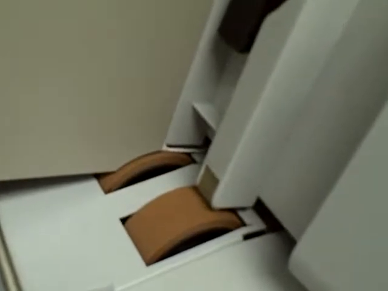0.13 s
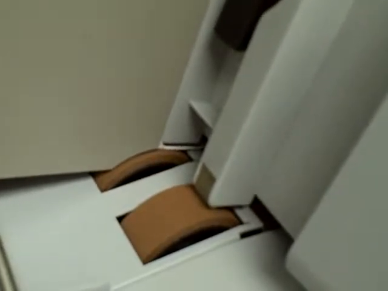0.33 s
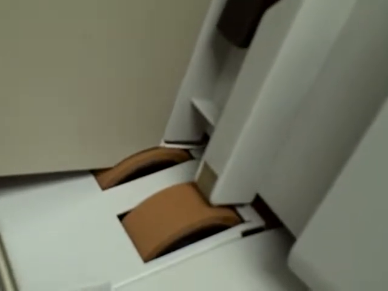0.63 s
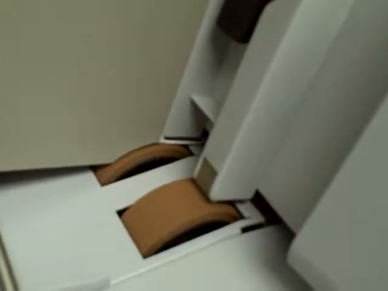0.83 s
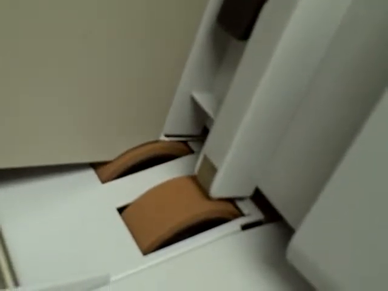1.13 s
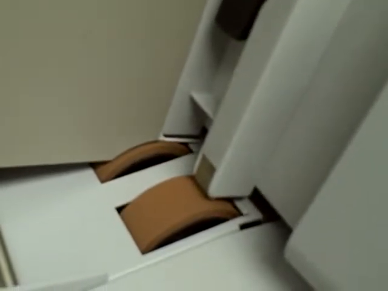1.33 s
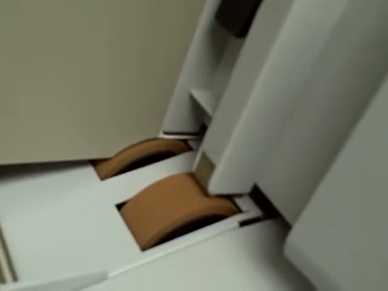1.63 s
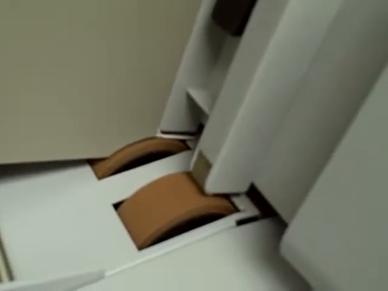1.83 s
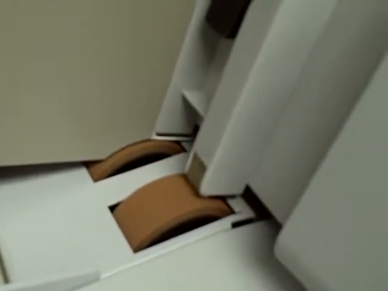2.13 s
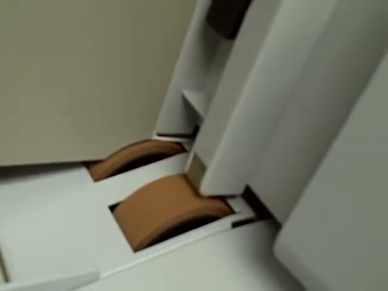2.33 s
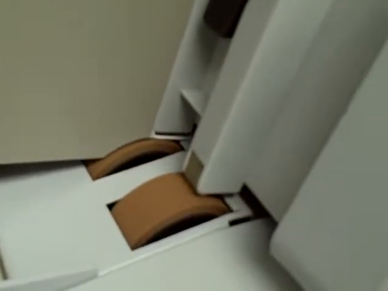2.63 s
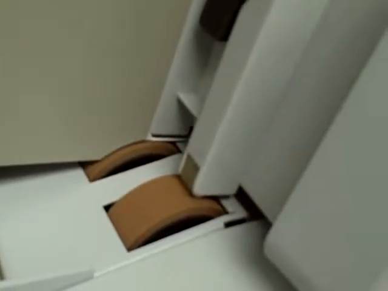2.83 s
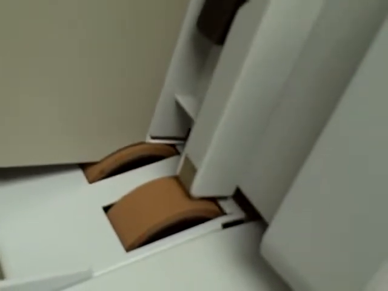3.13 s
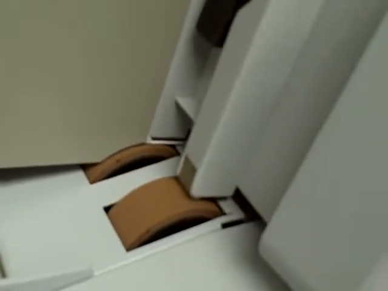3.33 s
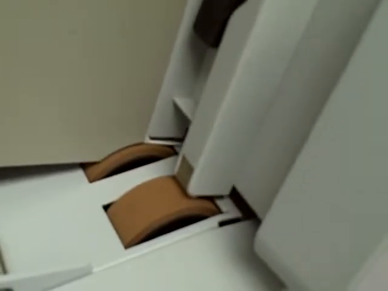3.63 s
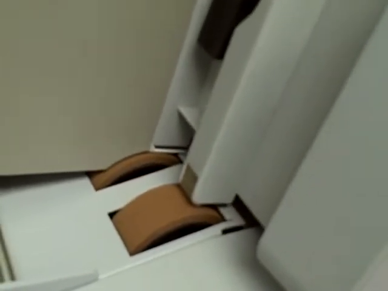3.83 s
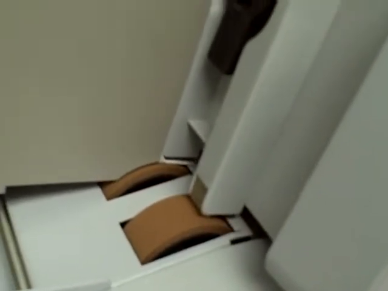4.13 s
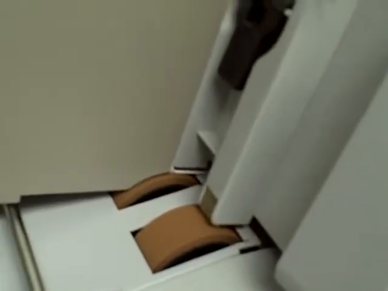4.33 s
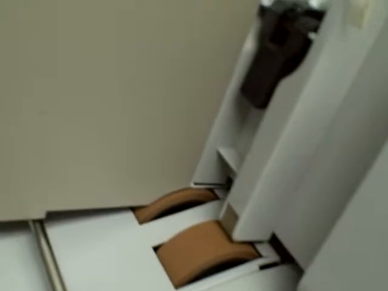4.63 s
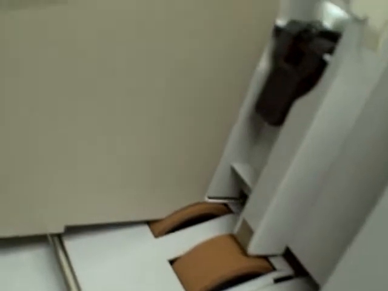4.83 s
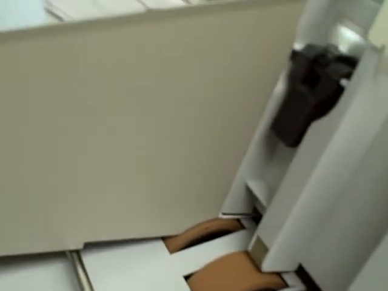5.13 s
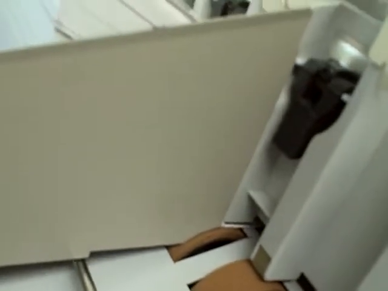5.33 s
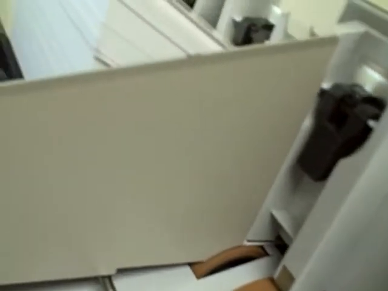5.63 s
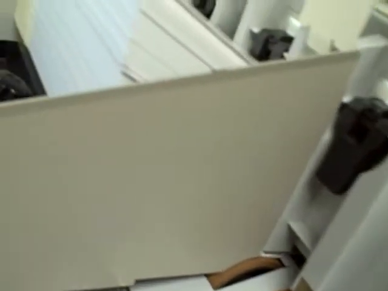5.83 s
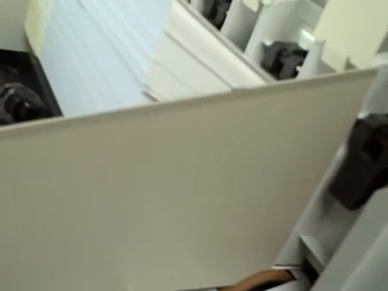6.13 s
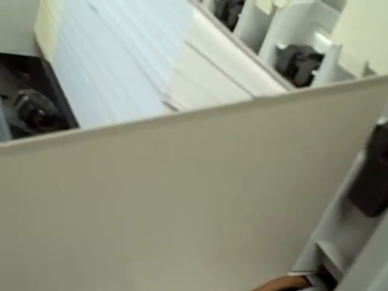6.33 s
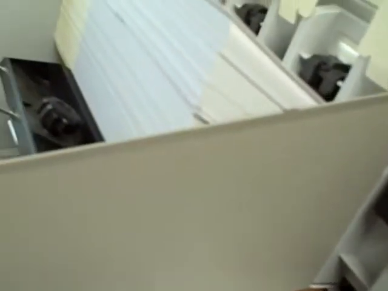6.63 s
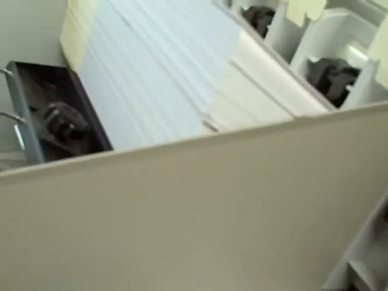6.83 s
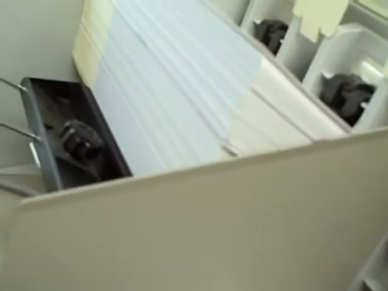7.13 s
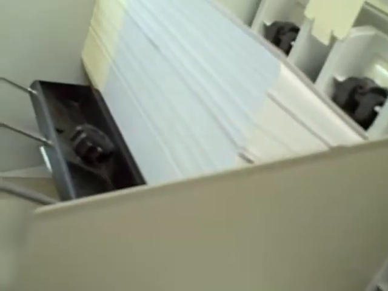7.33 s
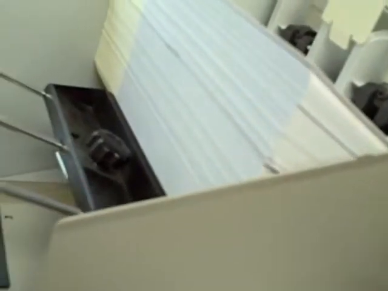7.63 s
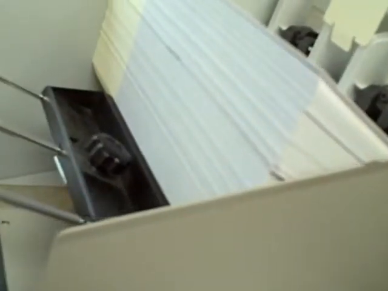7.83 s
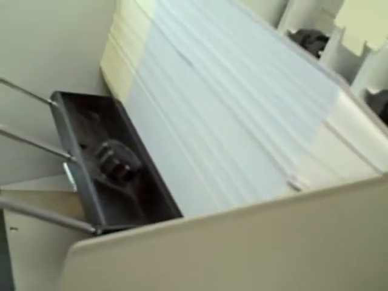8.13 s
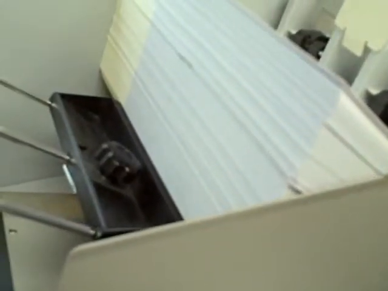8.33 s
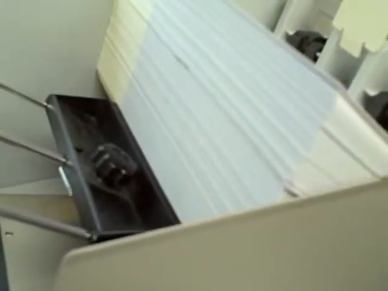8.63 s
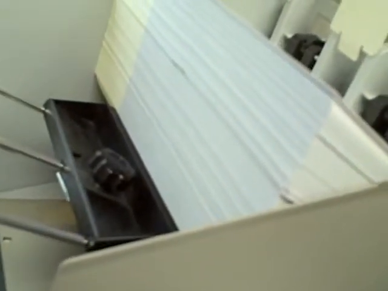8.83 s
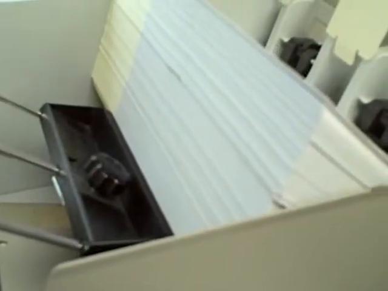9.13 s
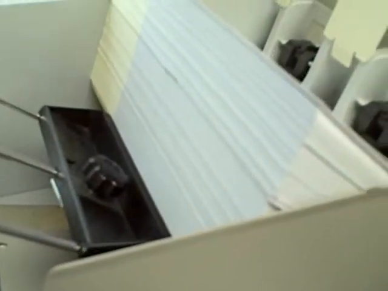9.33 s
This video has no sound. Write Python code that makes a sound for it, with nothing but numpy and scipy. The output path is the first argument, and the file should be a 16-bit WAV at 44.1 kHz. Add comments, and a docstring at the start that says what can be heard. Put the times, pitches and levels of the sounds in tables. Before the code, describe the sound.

From 0 s a card slaps hard against a stop, and the cycle repeats evenly about every 0.58 s until the end near 9.4 s, some seventeen slaps in all. Between slaps the rollers jerk twice, roughly 0.15 s apart, each a short dry rasp with a tiny squeak and a flick as the card comes free. A rattling run of about an eighth of a second then drives the card to the stop: a bright crack with a woody knock and quick rebound. The plastic housing booms and shudders below; loose levers click irregularly, one sharp, high clack standing out near 6.9 s. Faint motor hum and whir continue underneath. From about 4.5 to 7 s the close microphone rises from the rollers towards the stack: runs soften slightly, plate ring and a faint gear whine grow. Small room, short echo, crisp but treble-limited, peaks slightly saturated.

```python
"""A card slaps against a stop, then the next ones follow at about 1.7 a second, close to a small microphone.
This is an addressing printer: for each card the rollers jerk twice, then the card rattles to the stop.
Rollers, runs and clicks are shaped noise; the stop, levers and card edges are decaying sines.
The plastic housing booms as noise and pushes through resonances; rocking, brushes and echoes are noise too.
A motor hums underneath as unsteady sines and whirring noise, in a small room."""
import sys
import numpy as np
from scipy import signal
from scipy.fft import rfft, irfft, next_fast_len
from scipy.io import wavfile
from scipy.ndimage import uniform_filter1d, map_coordinates

SR = 44100
rng = np.random.default_rng(int(sys.argv[2]) if len(sys.argv) > 2 else 0)


def store_pcm(level_fs):
    """Save levels as 16-bit WAV."""
    pcm = np.round(np.clip(level_fs, -1, 1) * 32767).astype(np.int16)
    wavfile.write(sys.argv[1], SR, np.atleast_2d(pcm).T)


N = 418509

# All levels are relative.
# feed roller jerks, two per card: t/s, grab level/dB, drag level/dB
JERKS = [(.179, -14, -18), (.332, -15.5, -25), (.763, -13.5, -30), (.904, -14, -27), (1.334, -12, -18.5),
         (1.477, -13, -36), (1.901, -15, -37), (2.022, -12, -17), (2.483, -14, -17), (2.657, -15.5, -30),
         (3.084, -15, -25.5), (3.222, -13, -31.5), (3.664, -13, -16.5), (3.824, -16, -33),
         (4.25, -14.5, -26.5), (4.389, -15, -29.5), (4.824, -14, -18), (4.989, -17, -29.5),
         (5.412, -15.5, -26.5), (5.549, -16.5, -31.5), (5.989, -15.5, -18), (6.152, -18, -37.5),
         (6.571, -18.5, -35), (6.698, -15, -19.5), (7.159, -15, -22.5), (7.287, -15, -29),
         (7.747, -15, -43), (7.882, -17, -29.5), (8.318, -15, -18.5), (8.487, -18.5, -33.5),
         (8.931, -18, -33), (9.051, -16, -20.5)]
# cards reaching the stop: t/s, slap level/dB
STOP_HITS = [(.009, -8.5), (.608, -8), (1.176, -10), (1.755, -7.5), (2.330, -8), (2.932, -9), (3.499, -9.5),
             (4.100, -7.5), (4.66, -9.5), (5.263, -9.5), (5.824, -9.5), (6.429, -8), (7.003, -10.5),
             (7.565, -9), (8.160, -8), (8.762, -8.5), (9.368, -9.5)]
# loudest clacks of loose levers and card edges: t/s, level/dB, ring f/Hz
CLACKS = [(.826, -24.5, 2390), (1.555, -25, 6460), (1.979, -22.5, 2580), (3.170, -23, 6840),
          (4.303, -27, 5460), (6.660, -25.5, 2510), (6.878, -16, 6220), (7.812, -27, 5040)]
# housing resonances: f/Hz, width/Hz, level/dB
HOUSING_MODES = [(105.6, 5.8, -5), (135, 27, -4), (174, 8.6, 4.5), (195.3, 32.6, 3.5), (254.5, 20, -1.5),
                 (326.6, 23, 0.5), (376, 32, 0), (421.4, 34, -0.5), (480, 16, -3), (570.5, 14.7, 1),
                 (621, 17, -5.5), (691, 18, -7.5), (798, 20, -4.5)]
# thin guide plate resonances: f/Hz, width/Hz, level/dB
PLATE_MODES = [(1286, 69, -3), (1708, 47, 0), (1680, 46, 1), (1964, 60, -11.5)]
# machine rocking on its feet: f/Hz, width/Hz, level/dB
FRAME_MODES = [(19, 11, -0.5), (50, 11, 0.5), (92, 51, -8)]
# card stop modes: f/Hz, level/dB, t60/s
STOP_MODES = [(594, -12.5, 0.11), (637, -11.5, 0.081), (687, 1, 0.047), (784, -1.5, 0.026),
              (844, -7.5, 0.049), (1310, -10.5, 0.0059), (2220, -10, 0.0082)]
# spectrum of rasping and clicking: f/Hz, level per Hz/dB
RASP_SPECTRUM = [(250, -18), (600, -7.5), (950, -14.5), (1500, -11), (2200, -11), (3000, -11.5), (3800, -9),
                 (4900, -8.5), (5700, -3), (6500, -1.5), (7300, -4), (8200, -17.5), (9200, -34),
                 (10500, -70)]
# spectrum of the idle rollers: f/Hz, level per Hz/dB
WHIR_SPECTRUM = [(10, -21), (20, 8), (55, -1.5), (105, 2), (180, 1.5), (290, -2.5), (400, -1), (700, -7),
                 (1100, -20.5), (3000, -23), (5000, -18.5), (6600, -16), (8000, -19), (9500, -66.5)]
# motor lines: f/Hz, level/dB
HUM_LINES = [(108, -44), (335, -54.5)]
# room decay: f/Hz, t60/s
ROOM_DECAY = [(100, 0.58), (600, 0.36), (2000, 0.28), (8000, 0.099)]
# microphone moving from the housing up over the plates: t/s, housing level/dB, plates level/dB
NEARNESS_LEVELS = [(0, 0.5, -15), (2.8, -2, -17.5), (4.6, -2, -16.5), (6.2, -1.5, -12.5),
                   (7.5, -1.5, -13.5), (9.4, -1, -14)]
# transport fading as the microphone leaves the rollers: t/s, run level/dB
RUN_LEVELS = [(0, -16.5), (4.5, -17), (6.5, -19.5), (9.4, -19.5)]
# gear whine, following the microphone's distance to the upper works: t/s, level/dB
WHINE_LEVELS = [(0, -55), (4.6, -56.5), (6.5, -52), (8.2, -51), (9.4, -55)]

GRAB_S, DRAG_S = .013, .06  # roller bite; card comes free
GRAB_RISE_S, GRAB_FIRST_SHARE = .0083, .88  # grip tightens from this share
RUN_S = .128  # drive before the stop
GATE_LEAD_S, REBOUND_S = .04, .0033  # before and after the stop hit
# tick as the drive takes up slack
SLACK_CHANCE, SLACK_LEAD_S, SLACK_SCATTER_S = .55, .028, .007
SLACK_MEAN_DB, SLACK_MEAN_HZ = -29.5, 5800
FLICK_RE_DRAG_DB, FLICK_MEAN_HZ = -4, 4660  # card edge coming free
SQUEAK_LAG_S, SQUEAK_RE_GRAB_DB, SQUEAK_MEAN_HZ = .007, -2.5, 6450  # rubber biting
TICK_SCATTER_DB, TICK_SCATTER_OCT = 3, .13
MIC_CORNER_HZ, TOP_HZ, CLIP_LEVEL = 8600, 15900, .78


def amp(db):
    """Decibels to gain."""
    return 10 ** (np.asarray(db) / 20)


def unit(x):
    """Scaled to rms 1."""
    return x / np.sqrt(np.mean(np.abs(x) ** 2) + 1e-20)


def along(points, hz):
    """(Hz, value) points interpolated on a log axis."""
    f, v = np.transpose(points)
    return np.interp(np.log(hz + 1), np.log(f + 1), v)


def at_each_sample(t_s, values):
    """A timed curve read at every sample."""
    return np.interp(np.arange(N) / SR, t_s, values)


def wobble(rate_hz):
    """Smooth random curve, rate_hz knots a second."""
    knots = rng.standard_normal(int(N * rate_hz / SR) + 4)
    return map_coordinates(knots, [np.arange(N) * rate_hz / SR])


def filtered(x, response):
    """x times a response of frequency."""
    m = next_fast_len(N + SR // 2)
    return irfft(rfft(x, m) * response(np.fft.rfftfreq(m, 1 / SR)), m)[:N]


def coloured(x, spectrum):
    """x through a broad spectrum of rms gain 1."""
    return filtered(x, lambda f: unit(amp(along(spectrum, f))))


def rung(x, modes):
    """x through parallel resonances, rms gain 1 together."""
    def response(f):
        return unit(sum(amp(db) * 1j * f * w / (c * c - f * f + 1j * f * w) for c, w, db in modes))
    return filtered(x, response)


def chatter(rate_hz, depth_db):
    """Noise bunched into tiny irregular contacts."""
    level_db = depth_db * np.clip(wobble(rate_hz), -2, 2)
    return unit(rng.standard_normal(N) * amp(level_db))


def fade(t, hold_s, t60_s):
    """Zero before t = 0, one while held, then exponential decay."""
    return (t >= 0) * amp(-60 * np.maximum(t - hold_s, 0) / t60_s)


def add(track, t_s, piece):
    """Adds a piece to the track at time t_s."""
    at = round(t_s * SR) + np.arange(len(piece))
    inside = (at >= 0) & (at < N)
    track[at[inside]] += piece[inside]


def knocks(rows, hold_s, t60_s):
    """Envelope of short blows from (s, dB) rows, summed as power."""
    power, t = np.zeros(N), np.arange(SR // 4) / SR
    for t_s, db in rows:
        add(power, t_s, (amp(db) * fade(t, hold_s, t60_s)) ** 2)
    return np.sqrt(power)


def transport():
    """Feeding and running rasp on the card, ring the plates, boom in the housing and rock the frame."""
    housing_db, plates_db = nearness()
    grab, drag = feed_force(grab_t60_s=.12, drag_t60_s=.17, touch_db=-5, touch_t60_s=.018)
    feed = np.hypot(grab, drag)
    run = run_force(start_share=.27, swell_s=.024, coast_s=.062, coast_t60_s=.66, brake_t60_s=.13)

    # card kicks the gate
    gate_rows = [(stop_s - GATE_LEAD_S, run_db + 3) for stop_s, run_db in runs()]
    gate = knocks(gate_rows, hold_s=.0047, t60_s=.14)
    # card catches and slips on the rollers
    slip = amp(.92 * wobble(130))
    feed_rasp = amp(-.9) * feed * chatter(600, depth_db=1.5)
    run_rasp = run * chatter(450, depth_db=1)
    contact = slip * (feed_rasp + run_rasp) + gate * chatter(700, depth_db=.5)
    rasp = coloured(flexing(contact, depth_db=3), RASP_SPECTRUM)

    plates = amp(plates_db) * rung(np.hypot(feed, run) * chatter(50, depth_db=4), PLATE_MODES)

    # heavy housing lags the rollers and builds up slowly in a run
    heave = np.pad(feed, (round(.012 * SR), 0))[:N]
    boom = run_force(start_share=.3, swell_s=.12, coast_s=.075, coast_t60_s=.39, brake_t60_s=.15)
    rattle = (amp(-7.5) * heave + amp(-2.5) * boom) * chatter(200, depth_db=1.5)
    pushes = amp(-3) * shoves(clutch_lag_s=.02, release_lag_s=.071, width_s=.0013)
    housing = amp(housing_db) * rung(rattle + pushes, HOUSING_MODES)

    rocking = amp(-8.5) * drag + amp(-19.5) * grab + amp(-28) * run
    frame = rung(rocking * rng.standard_normal(N), FRAME_MODES)
    return rasp + plates + housing + frame


def feed_force(grab_t60_s, drag_t60_s, touch_db, touch_t60_s):
    """A roller touches the card and tightens its grip; its drag grows until the card comes free."""
    grab, drag, t = np.zeros(N), np.zeros(N), np.arange(SR // 3) / SR
    touch = amp(touch_db) * fade(t, 0, touch_t60_s)[::-1]  # swells up to the grab
    grip = np.interp(t, [0, GRAB_RISE_S], [GRAB_FIRST_SHARE, 1]) * fade(t, GRAB_S, grab_t60_s)
    grab_shape = np.concatenate([touch, grip])
    growth = np.minimum(t / DRAG_S, 1)
    release = fade(t, DRAG_S, drag_t60_s)
    for t_s, grab_db, drag_db in JERKS:
        add(grab, t_s - len(t) / SR, (amp(grab_db) * grab_shape) ** 2)
        add(drag, t_s, growth * (amp(drag_db) * release) ** 2)
    return np.sqrt(grab), np.sqrt(drag)


def run_force(start_share, swell_s, coast_s, coast_t60_s, brake_t60_s):
    """The transport gathers speed, drives the card up to the stop, coasts and brakes."""
    power, t = np.zeros(N), np.arange(SR // 2) / SR
    coasting = fade(t, RUN_S, coast_t60_s)
    braking = fade(t, RUN_S + coast_s, brake_t60_s)
    drive = np.minimum(start_share + t / swell_s, 1) * coasting * braking
    for stop_s, run_db in runs():
        add(power, stop_s - RUN_S, (amp(run_db) * drive) ** 2)
    return np.sqrt(power)


def runs():
    """One transport run per card: (stop s, run dB)."""
    return [(stop_s, np.interp(stop_s, *np.transpose(RUN_LEVELS))) for stop_s, _ in STOP_HITS]


def shoves(clutch_lag_s, release_lag_s, width_s):
    """Soft pushes on the housing: the clutch engages, the gate swings, the clutch lets go."""
    track, t = np.zeros(N), np.arange(SR // 40) / SR
    push = (1 - t / width_s) * np.exp(-t / width_s)
    moves = [(clutch_lag_s - RUN_S, 0), (-GATE_LEAD_S, -1), (release_lag_s, -5)]  # lag/s, level/dB
    for stop_s, run_db in runs():
        for lag_s, db in moves:
            t_s = stop_s + lag_s + rng.normal(0, .00203)
            add(track, t_s, amp(run_db + db + rng.normal(0, .91)) * push)
    return track


def flexing(x, depth_db):
    """The card bends as it moves, so its colour shifts in short time-frequency patches."""
    z = signal.stft(x, nperseg=256)[2]
    patches = uniform_filter1d(rng.standard_normal(z.shape), size=3, axis=0)
    patches = uniform_filter1d(patches, size=6, axis=1)
    return signal.istft(z * unit(amp(depth_db * unit(patches))), nperseg=256)[1][:N]


def nearness():
    """Housing and plate levels at the microphone, in dB at each sample."""
    t_s, *columns = np.transpose(NEARNESS_LEVELS)
    return [at_each_sample(t_s, level_db) for level_db in columns]


def slaps():
    """The card hits the stop, which knocks as damped sines, and rebounds once as a second noise burst."""
    knock, t = np.zeros(N), np.arange(SR // 8) / SR
    for t_s, db in STOP_HITS:
        ring = np.zeros(len(t))
        for hz, mode_db, t60_s in STOP_MODES:
            gain = amp(mode_db + rng.normal(0, 2.3))
            mode_hz = hz * (1 + rng.normal(0, .019))
            ring += gain * fade(t, 0, t60_s) * np.sin(2 * np.pi * mode_hz * t)
        add(knock, t_s + .00149, amp(db) * ring)
    first = knocks(STOP_HITS, hold_s=.0019, t60_s=.01)
    second = knocks([(t_s + REBOUND_S, db) for t_s, db in STOP_HITS], hold_s=.001, t60_s=.094)
    crack = np.hypot(amp(-2.5) * first, amp(-1) * second) * chatter(900, depth_db=1)
    bright = amp(-.5) * coloured(crack, RASP_SPECTRUM)
    body = amp(-12) * rung(crack, [(2200, 1600, 0)])
    return bright + body + amp(-3.5) * knock


def ticks(ring_t60_s, blur_rad):
    """Each small part clicks and buzzes briefly around its own pitch, its phase wandering at random."""
    rings, t = np.zeros(N), np.arange(SR // 8) / SR
    rows, jitter = CLACKS + small_ticks(), rng.standard_normal(N + SR)
    envelope = np.minimum(t / .0017, 1) * fade(t, 0, ring_t60_s)
    for t_s, db, hz in rows:
        wander = np.cumsum(jitter[abs(round(t_s * SR)):][:len(t)])
        phase = 2 * np.pi * hz * t + blur_rad * wander
        add(rings, t_s, amp(db) * envelope * np.sin(phase))
    blows = knocks([(t_s, db) for t_s, db, _ in rows], hold_s=.0036, t60_s=.089)
    clicks = blows * chatter(640, depth_db=2)
    return amp(3) * rings + amp(-1.5) * coloured(clicks, RASP_SPECTRUM)


def small_ticks():
    """Every jerk squeaks and ends in a flick; a card's second jerk and its run may start with a slack tick."""
    squeaks = [(t_s + SQUEAK_LAG_S, grab_db + SQUEAK_RE_GRAB_DB, SQUEAK_MEAN_HZ) for t_s, grab_db, _ in JERKS]
    flicks = [(t_s + DRAG_S, drag_db + FLICK_RE_DRAG_DB, FLICK_MEAN_HZ) for t_s, _, drag_db in JERKS]
    moves = [t_s for t_s, _, _ in JERKS[1::2]] + [stop_s - RUN_S for stop_s, _ in STOP_HITS]
    slack = varied([(t_s - SLACK_LEAD_S + rng.normal(0, SLACK_SCATTER_S), SLACK_MEAN_DB, SLACK_MEAN_HZ)
                    for t_s in moves])
    return varied(squeaks + flicks) + [row for row in slack if rng.random() < SLACK_CHANCE]


def varied(rows):
    """(s, dB, ring Hz) rows, each a little different in level and pitch."""
    draws = rng.standard_normal((len(rows), 2))
    return [(t_s, db + TICK_SCATTER_DB * loud, hz * 2 ** (TICK_SCATTER_OCT * high))
            for (t_s, db, hz), (loud, high) in zip(rows, draws)]


def rustles():
    """The waiting stack shifts in faint, irregular brushes of noise."""
    brushes = chatter(45, depth_db=8) * amp(2.4 * wobble(400))
    return amp(-42.5) * coloured(flexing(brushes, depth_db=5), RASP_SPECTRUM)


def motor():
    """The motor hums and the idle rollers whir; a gear whines from the upper works."""
    hum = sum(amp(db) * tone(hz, waver_db=3.5) for hz, db in HUM_LINES)
    whine = amp(at_each_sample(*np.transpose(WHINE_LEVELS))) * tone(hz=1390, waver_db=2.5)
    whir = amp(-35) * coloured(chatter(60, depth_db=3), WHIR_SPECTRUM)
    return hum + whine + whir


def tone(hz, waver_db):
    """Sine of rms 1, slightly unsteady in phase and level."""
    phase = 2 * np.pi * hz * np.arange(N) / SR + .78 * wobble(5.2)
    return unit(amp(waver_db * wobble(7)) * np.sin(phase))


def room(x):
    """Walls answer as decaying noise, bass longest; a fresh random tail each 1/3 s keeps the echo smooth."""
    wet, step = np.zeros(N), SR // 3
    for at in range(0, N, step):
        hz, t, z = signal.stft(rng.standard_normal(SR // 2), SR, nperseg=256)
        decay = amp(-60 * t / along(ROOM_DECAY, hz)[:, None])
        tail = signal.istft(z * decay, SR, nperseg=256)[1]
        echo = signal.fftconvolve(x[at:at + step], tail / np.linalg.norm(tail))
        add(wet, at / SR + .005, echo)
    return wet


def scene():
    """The printer in its room."""
    printer = transport() + slaps() + ticks(ring_t60_s=.051, blur_rad=.16) + rustles()
    return (printer + amp(-14.5) * room(printer) + motor())[None]


def record(dry):
    """Narrow-band microphone: steep treble cut, then peaks saturate near CLIP_LEVEL, then a band limit."""
    heard = filtered(dry[0], lambda hz: 1 / np.sqrt(1 + (hz / MIC_CORNER_HZ) ** 40))
    clipped = heard / (1 + np.abs(heard / CLIP_LEVEL) ** 12) ** (1 / 12)
    return filtered(clipped, lambda hz: hz < TOP_HZ)[None]


dry = scene()
out = record(dry)
store_pcm(out)
```